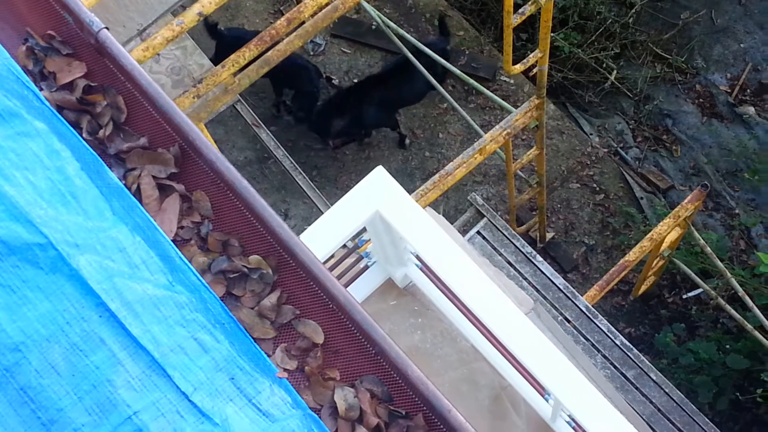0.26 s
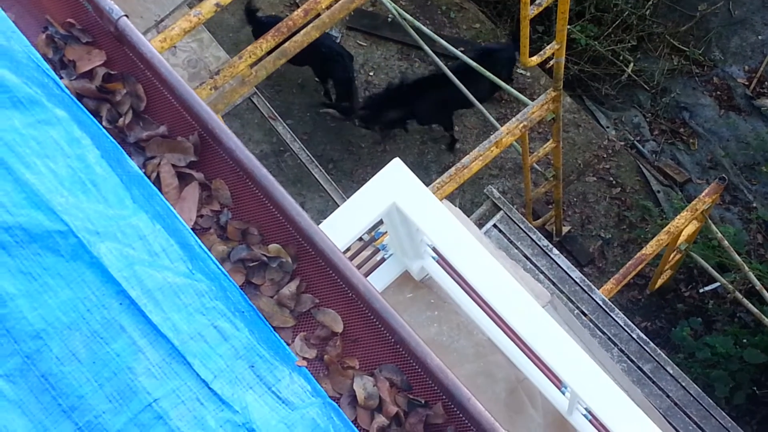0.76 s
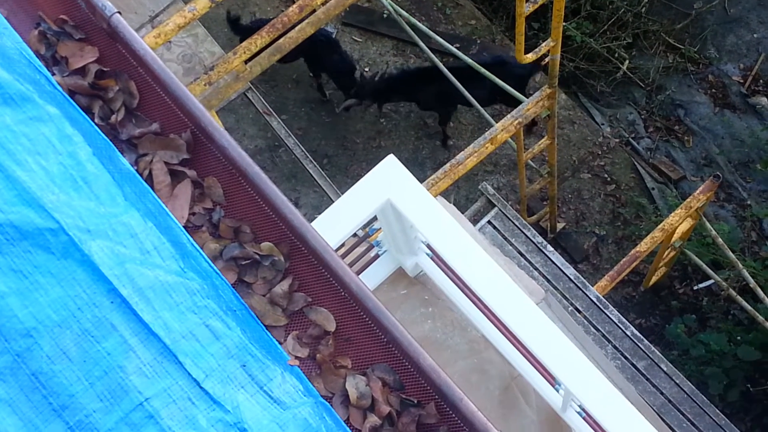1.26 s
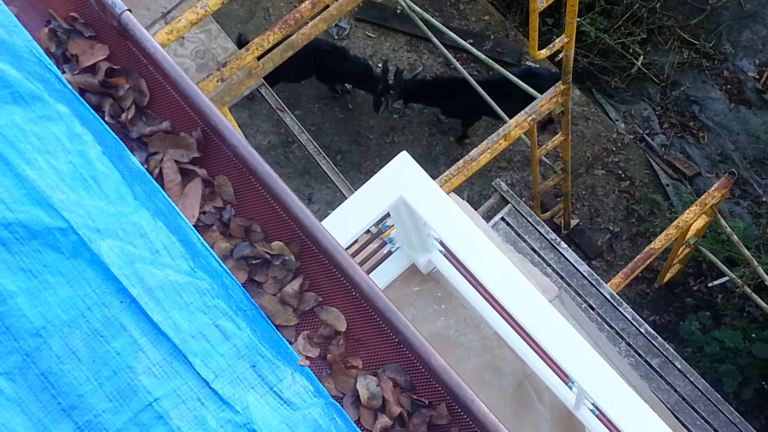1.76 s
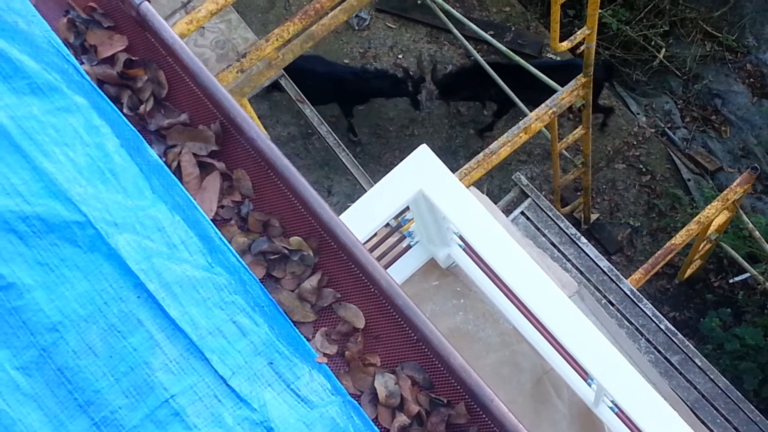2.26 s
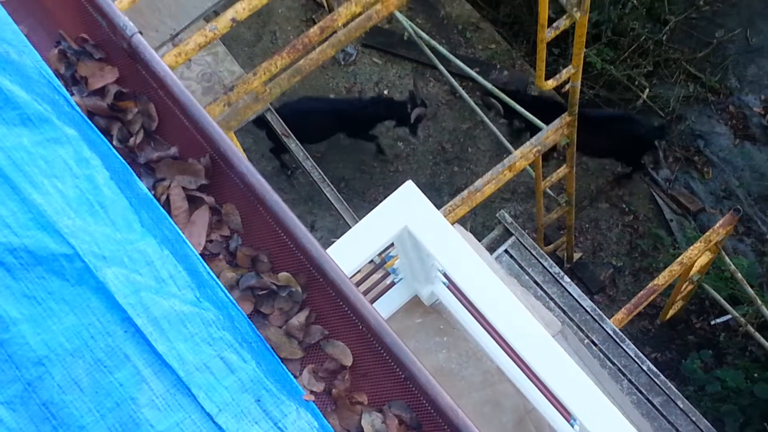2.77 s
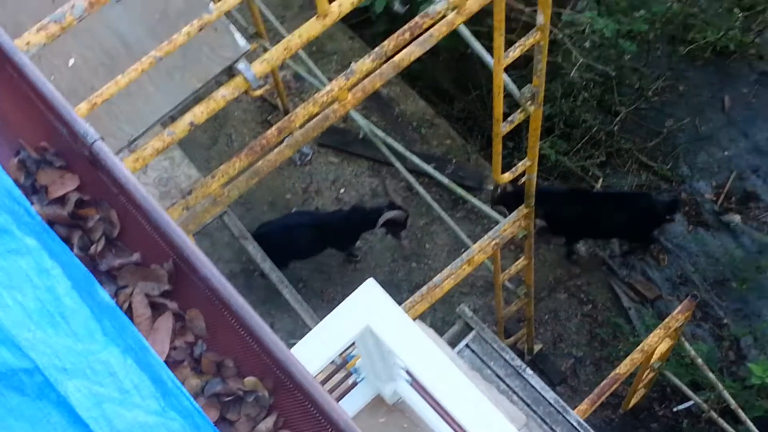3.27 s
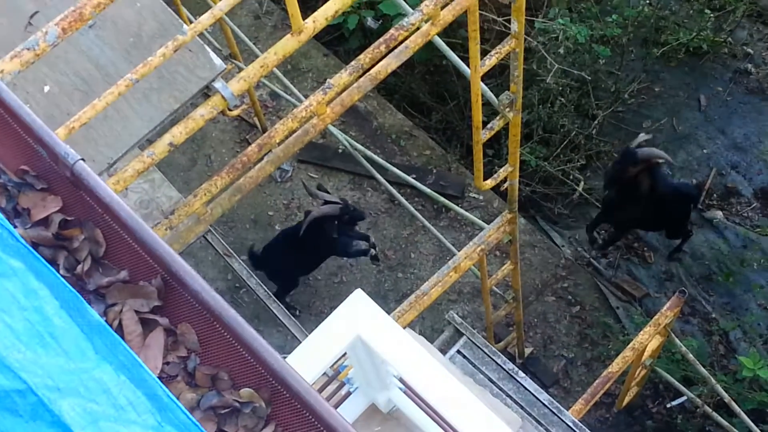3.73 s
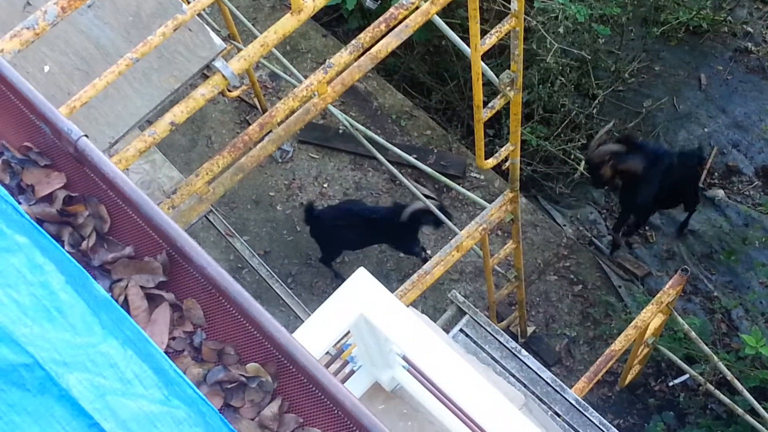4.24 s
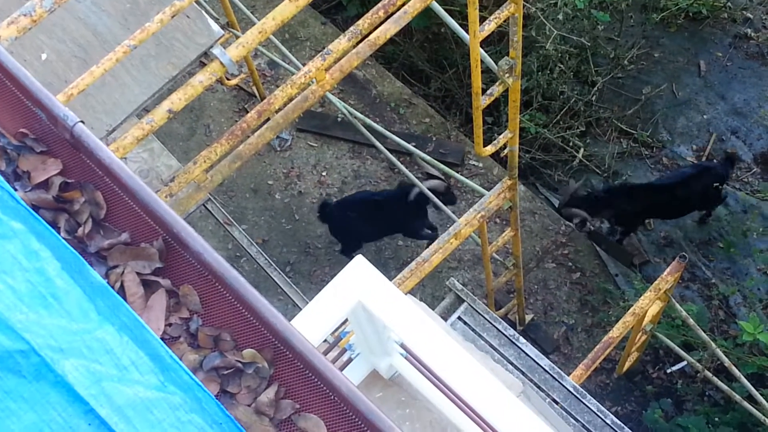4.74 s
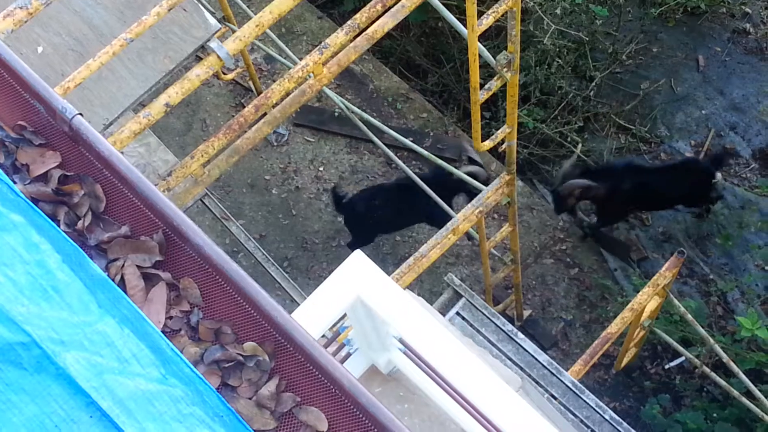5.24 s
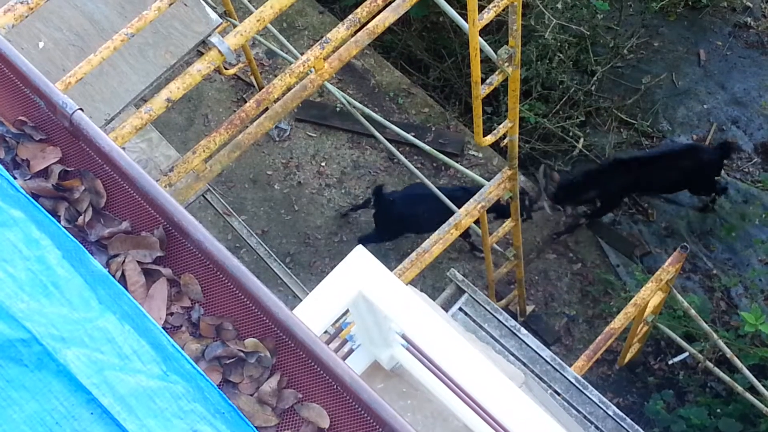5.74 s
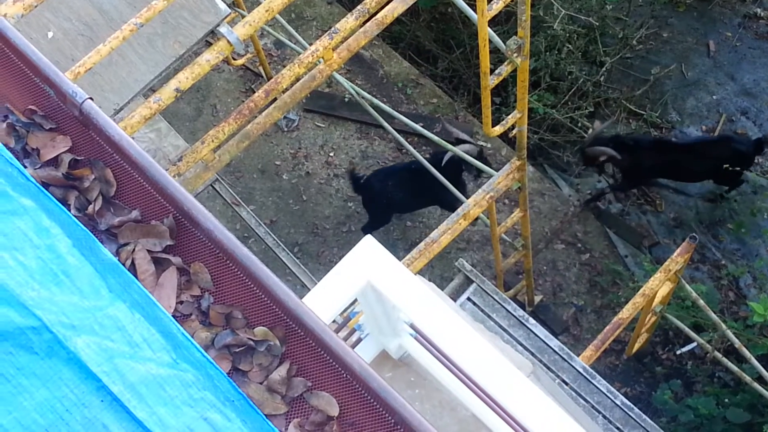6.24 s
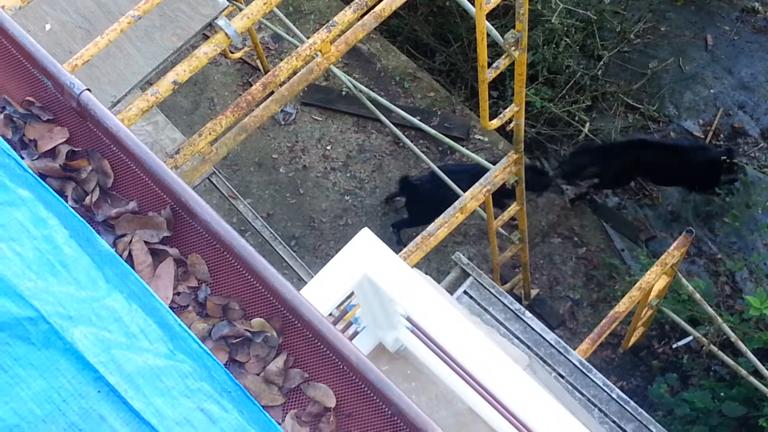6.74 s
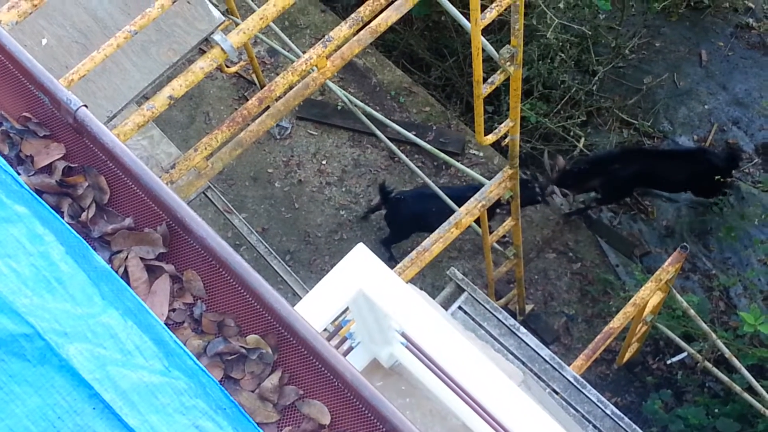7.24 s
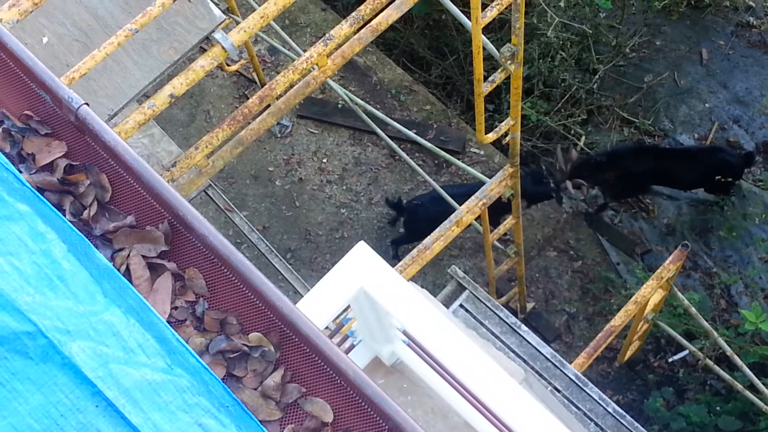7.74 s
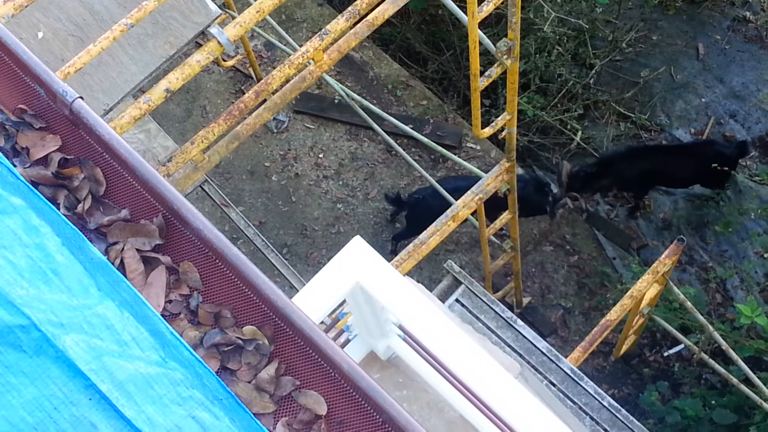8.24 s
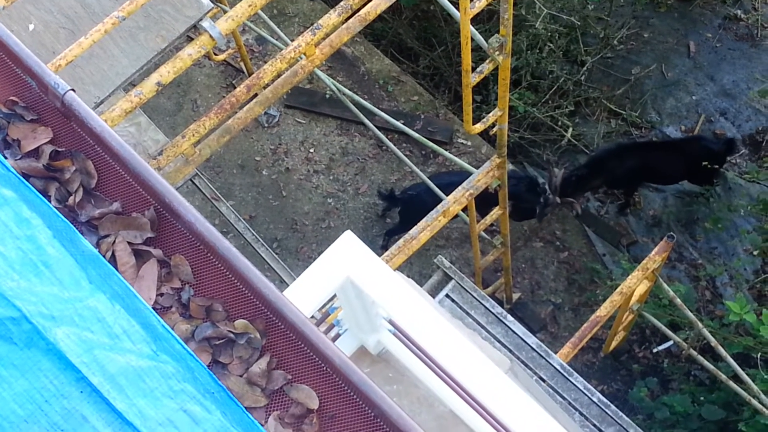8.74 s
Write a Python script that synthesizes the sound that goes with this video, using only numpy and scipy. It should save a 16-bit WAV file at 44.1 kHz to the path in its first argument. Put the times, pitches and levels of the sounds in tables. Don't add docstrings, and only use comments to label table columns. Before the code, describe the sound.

Outdoors, heard from above in stereo, dry litter crunches and crackles under two sparring goats. Small knocks and light stamps lead to a double-contact horn crack, then a second, loudest clash with a dull thump and thrown leaves, after which the rustling thins out. Sharp bird chips punctuate throughout, two blurred trills echo off walls, and a faint low motor hum and thin insect line sit far beneath.

```python
import sys
import numpy as np
from scipy import signal
from scipy.io import wavfile
from scipy.ndimage import uniform_filter1d

SR = 44100
rng = np.random.default_rng(int(sys.argv[2]) if len(sys.argv) > 2 else 0)


def output_pcm(signal):
    pcm = np.clip(np.atleast_2d(signal).T, -1, 1) * 32767
    wavfile.write(sys.argv[1], SR, np.round(pcm).astype(np.int16))


def voltage_ratio(decibels):
    exponent = np.asarray(decibels, float) / 20
    return 10 ** exponent


N = 396900


def at_hz(points, hz):
    points_hz, level_db = np.transpose(points)
    return np.interp(np.log(hz), np.log(points_hz), level_db)


def rms_one(x):
    return x / np.sqrt(np.mean(x ** 2) + 1e-20)


def drift(rate):
    r = np.exp(-80 * np.pi * rate / SR)
    slow = signal.lfilter([1], [1, -2 * r, r * r], rng.standard_normal(N // 40 + 2002))[2000:]
    return np.interp(np.arange(N) / 40, np.arange(len(slow)), rms_one(slow))


def resonate(x, hz, width_hz):
    r = np.exp(-np.pi * width_hz / SR)
    poles = [1, -2 * r * np.cos(2 * np.pi * hz / SR), r * r]
    return signal.lfilter(np.array([1, 0, -1]) * (1 - r * r) / 2, poles, x)


def add(out, s, piece, pan_db, lag_s=0):
    for ear, (at, db) in enumerate([(s + lag_s, pan_db / 2), (s, -pan_db / 2)]):
        i = round(at * SR)
        heard = np.atleast_2d(piece)[-ear][:N - i]
        out[ear, i:i + len(heard)] += heard * voltage_ratio(db)


def burst(dying_s, rise_share):
    dying_s = np.clip(dying_s, .004, .3)
    t = np.arange(int(dying_s * SR)) / SR
    return (1 - np.exp(-t / (rise_share * dying_s))) * voltage_ratio(-60 * t / dying_s)


def whistle(rows, waver_hz):
    s, hz, db = np.transpose(rows)
    t = np.arange(s[0], s[-1], 1 / SR)
    waver = waver_hz * uniform_filter1d(rng.standard_normal(len(t)), size=100) * 10
    phase = 2 * np.pi * np.cumsum(np.interp(t, s, hz) + waver) / SR
    ends = np.clip(np.minimum(t - s[0], s[-1] - t) / .003, 0, 1)
    return np.sqrt(2) * ends * voltage_ratio(np.interp(t, s, db)) * np.sin(phase)


def crackle(per_s, spread_db):
    sizes = voltage_ratio(spread_db * np.minimum(rng.exponential(1, (2, 2, N)), 3.5))
    breaking = rng.random((2, 1, N)) < per_s / SR
    return rng.standard_normal((2, 2, N)) * (1 + sizes * breaking)


# f/Hz, likeness [share]
LIKENESS = [(60, 0.6), (300, 0.45), (700, 0.22), (1500, 0.16), (3000, 0.024), (8000, 0.012)]
FLAT_ABOVE_HZ = 13500


def coloured(source, spectrum, patchy_db):
    out, together = 0, drift(13.8)
    lowest, highest = spectrum[0][0], spectrum[-1][0]
    edges = np.geomspace(lowest, highest, round(2 * np.log2(highest / lowest)) + 1)
    for k, (low, high) in enumerate(zip(edges, edges[1:])):
        band = signal.butter(2, [low, high], "band", fs=SR, output="sos")
        mid, side = signal.sosfilt(band, source[k % 2])
        hz = np.sqrt(low * high)
        alike = np.clip(at_hz(LIKENESS, hz), -1, 1)
        flicker_db = patchy_db * (.45 * together + .9 * drift(20))
        gain = voltage_ratio(at_hz(spectrum, min(hz, FLAT_ABOVE_HZ)) + flicker_db)
        out = out + gain * (np.sqrt(1 + alike) * mid + np.sqrt(1 - alike) * side * [[1], [-1]])
    return rms_one(out)


# f/Hz, density level/dB
AIR = [(15, -37.5), (25, 1), (60, -2), (330, 0), (981, -9.5), (2360, -15), (6840, -14.5), (14400, -18)]
AIR_DB = -70.5


def air():
    return voltage_ratio(AIR_DB) * coloured(rng.standard_normal((2, 2, N)), AIR, patchy_db=1.5)


# from t/s, to t/s
INSECT_PAUSES = [
    (3.9, 4.0),
    (4.27, 4.4),
    (7.96, 8.02),
    (8.27, 8.32),
    (8.57, 8.72),
]
INSECT_HZ, INSECT_DB = 10250, -78


def insect():
    t = np.arange(N) / SR
    resting = sum((t > start) & (t < end) for start, end in INSECT_PAUSES)
    singing = uniform_filter1d(1. - resting, size=400)
    hiss = rng.standard_normal((2, N))
    line = resonate(resonate(hiss, INSECT_HZ, 90), INSECT_HZ, 90) + .02 * np.sin(2 * np.pi * INSECT_HZ * t)
    return singing * voltage_ratio(INSECT_DB + drift(2)) * rms_one(line)


# peak t/s, leaf level/dB, time to sink 20 dB/s, twigs re leaves level/dB
STEPS = [(.27, -57, 0.28, -2), (.625, -66, 0.45, 2), (.685, -61, 0, -6), (.738, -57.5, 0.16, -1),
         (0.885, -57, 0.05, -3), (1.112, -64, .05, -2), (1.291, -59.5, 0.06, 1.5), (1.518, -63.5, 0.07, -2),
         (1.604, -56.5, 0.56, -9), (2.698, -53, 0.06, -6), (4.679, -64, -0.7, 7), (4.72, -71, -0.3, -5),
         (2.874, -59.5, 0, -9), (2.98, -57, 0.3, -1.5), (3.273, -54.5, 0.09, -2), (3.425, -62.5, 0.2, 6.5),
         (3.49, -56.5, 0.14, -5.5), (4.138, -54, -0.12, -3), (4.252, -72, 0.4, -4), (4.474, -42.5, 0.06, 1),
         (4.875, -50, 0.14, 1), (5.4, -57.5, 0.13, 4), (5.774, -55, 0.02, 2), (5.833, -56.5, -0.1, -5),
         (5.89, -64, 0, -1.5), (6.085, -55.5, 0.46, -6), (6.862, -39, 0.0938, 1.5), (7.711, -61, 0.07, -3),
         (8.03, -62, 0.12, 2.5), (8.13, -65.5, -0.13, 0), (8.561, -65, -0.02, -1)]
STEP_SWELL_S, STEP_ROUNDNESS = 0.017, 1.77
# peak t/s, leaf level/dB, 20 dB swell/s, 20 dB sink/s, twigs re leaves level/dB
DRAGS = [(0.03, -48.5, 0, 0.2, -7.5), (.19, -48.5, 0.05, 0.03, -11), (.915, -50.5, -0.02, 0.06, -4.5),
         (1.348, -57, 0.05, 0.05, -2), (1.405, -56.5, 0.02, -0.06, -8), (2.655, -52.5, 0, 0.03, -6),
         (.476, -53, 0.36, 0.2, -2), (1.15, -67, 0.1, 0.02, 0), (1.76, -58, -0.2, 0.78, -12.5),
         (2.2, -57.5, .5, .5, -2), (2.5, -62, 1.6, 0.3, -0.5), (2.757, -55.5, 0.14, 0.04, -3.5),
         (2.905, -53.5, 0.03, 0.08, -4), (4.3, -66, 0.3, 0.2, -10), (4.595, -56.5, 0.17, -0.06, 2.5),
         (3.7, -60, 0.07, 0.26, 3), (4.378, -55, 0.17, 0.22, 3), (4.802, -62.5, 0.36, 0.16, 0),
         (5.118, -55.5, 0.17, -0.38, 3.5), (5.3, -57.5, 0.5, 0.14, 4.5), (5.44, -60, 0.26, -0.23, -6),
         (5.67, -51.5, 0.13, 0.21, 3.5), (6.03, -61.5, 0.5, 0.7, -1), (6.363, -55.5, 0.25, 0.53, -3.5),
         (6.76, -59, 0.6, 0.15, 1.5), (6.964, -48, -0.08, 0.0959, -5), (7.094, -48, -0.03, -0.0458, -4.5),
         (7.185, -58.5, 0.55, 0.07, -5.5), (7.3, -57, 0.17, 0.1043, -2), (7.75, -55.5, -0.03, 0.07, 0),
         (7.8, -59, 0, 0.06, -6), (1.44, -61, 0.12, -0.07, -5.5), (1.19, -62, .1, 0, 2.5),
         (8.247, -68.5, 0.3, 0, 0.5), (8.698, -78, 0.44, -0.1, 6), (8.86, -86.5, 2, 0, -6.5)]
DRAG_ROUNDNESS = 1.23
JOLT_DB, JOLT_DELAY_S, JOLT_SWELL_S, JOLT_SINK_S, JOLT_TWIGS_DB = -41, .005, 0.007, 0.17, 7
LITTER_REST_DB = -92


def stirring():
    t = np.arange(0, N + 16, 16) / SR
    moves = [(s, db, STEP_SWELL_S, sink_s, twig_db, STEP_ROUNDNESS) for s, db, sink_s, twig_db in STEPS]
    moves += [(*row, DRAG_ROUNDNESS) for row in DRAGS]
    moves += [(s + JOLT_DELAY_S, JOLT_DB, JOLT_SWELL_S, JOLT_SINK_S, JOLT_TWIGS_DB, STEP_ROUNDNESS)
              for s, *_ in CLASHES]
    s, db, swell_s, sink_s, twig_db, roundness = np.transpose(moves)[:, :, None]
    shortest_s = np.where(t < s, .003, .012)
    away = np.abs(t - s) / np.maximum(np.where(t < s, swell_s, sink_s), shortest_s)
    power = voltage_ratio(db - 20 * away ** roundness) ** 2
    layers = (power.sum(axis=0), (power * voltage_ratio(twig_db) ** 2).sum(axis=0))
    return [np.interp(np.arange(N) / SR, t, 10 * np.log10(p + voltage_ratio(LITTER_REST_DB) ** 2)) for p in layers]


# t/s, peak level/dB
SNAPS = [(0.023, -40), (0.2636, -36), (1.886, -69), (1.918, -29.5), (2.497, -30.5), (2.546, -36),
         (3.269, -54), (3.2889, -47.5), (3.4383, -32.5), (4.117, -35), (4.26, -38), (4.371, -37),
         (4.492, -24.5), (4.886, -39), (4.898, -22), (4.9298, -27), (4.966, -31), (5.049, -35),
         (5.111, -28.5), (5.8254, -58), (6.0896, -30), (6.2952, -30), (6.3108, -29), (6.868, -16.5),
         (6.9008, -12.5), (6.939, -21), (7.705, -47.5), (7.8023, -45), (8.558, -53)]
# f/Hz, density level/dB
LEAVES = [(1650, -29), (2800, -15.5), (3500, -7), (5000, -4.5), (7510, -0.5), (8900, -4.5), (11300, -4),
          (14400, -16)]
TWIGS = [(210, -33.5), (350, -5), (448, -3.5), (1600, -2.5), (1940, 0.5), (3400, -11.5), (4420, -39),
         (7480, -120)]
GROUND = [(18, -30.5), (30, -14), (86, -1), (211, -1), (324, -5.5), (450, -3.5), (580, -37.5), (990, -120)]
GROUND_DB, GROUND_FOLLOWS, GROUND_SLOW_S = -29, 0.58, 0.035
FINE_DB, FINE_PER_TWIG, FINE_PER_LEAF = -11, -0.96, -0.19


def scuffle():
    leaf_db, twig_db = stirring()
    fine_db = FINE_DB + FINE_PER_TWIG * (twig_db - leaf_db) + FINE_PER_LEAF * leaf_db
    ground_db = GROUND_DB + GROUND_FOLLOWS * uniform_filter1d(twig_db, size=int(GROUND_SLOW_S * SR))
    grains = crackle(per_s=600., spread_db=4.5)
    leaves = coloured(grains, LEAVES, patchy_db=2.0)
    fine = signal.sosfilt(signal.butter(2, 9500, "high", fs=SR, output="sos"), leaves)
    snaps = np.zeros((2, N))
    for s, db in SNAPS:
        add(snaps, s, voltage_ratio(db - 5) * burst(.015, rise_share=.015), pan_db=0)
    out = voltage_ratio(leaf_db + 8.0) * (leaves - fine)
    out += voltage_ratio(leaf_db + fine_db + np.array([[1.5], [-1.5]])) * rms_one(fine)
    out += snaps * leaves
    out += voltage_ratio(twig_db - 1.5) * coloured(grains, TWIGS, patchy_db=1.2)
    return out + voltage_ratio(ground_db - 2.0) * coloured(grains, GROUND, patchy_db=2.5)


# t/s, peak level/dB, f/Hz
TWIG_TICKS = [(0.022, -42, 3300), (0.734, -34.5, 2300), (1.624, -43, 2620), (2.751, -41.5, 2020),
              (3.036, -39, 1350), (3.466, -39, 2080), (3.835, -50, 1310), (4.232, -60.5, 1030),
              (4.392, -33, 1940), (4.822, -40.5, 2300), (4.864, -35, 1710), (4.898, -31.5, 1720),
              (4.94, -31, 2750), (5.042, -32.5, 1820), (5.073, -42, 1380), (5.412, -38, 2400),
              (5.441, -44.5, 2720), (5.612, -35, 2420), (5.665, -22, 950), (5.901, -52, 2010),
              (5.4845, -18, 3300), (5.4895, -19, 2900), (5.497, -18.5, 1100), (5.5345, -23, 800),
              (5.31, -45.5, 600), (6.52, -40, 1880), (5.935, -46, 2330), (6.025, -43.5, 2020),
              (6.115, -41, 2010), (6.248, -40.5, 2390), (6.379, -40, 1440), (6.762, -41, 1700),
              (6.805, -8, 1350), (6.814, -12, 1200), (6.9, -22, 1630), (7.06, -44, 1973),
              (7.725, -36, 2100), (7.949, -61, 771), (7.999, -54, 2050), (8.093, -51.5, 2720),
              (8.209, -56, 805)]
TWIG_TICK_S, TWIG_WIDTH_SHARE = 0.008, 0.41
# t/s, peak level/dB, f/Hz
LEAF_TICKS = [(0.0318, -23, 7930), (0.2663, -36, 7890), (0.6868, -37.5, 7500), (0.7554, -40, 7270),
              (0.8804, -38, 6800), (1.1672, -41, 7210), (1.516, -39.5, 6810), (1.6404, -35, 7100),
              (2.8998, -30.5, 7390), (2.9287, -32, 7690), (2.9484, -35, 6830), (3.269, -31.5, 6400),
              (3.4994, -31, 6060), (3.5064, -30, 5400), (3.5384, -39, 7510), (3.5774, -47, 6930),
              (3.6641, -38, 9210), (4.2482, -42, 7600), (4.3011, -40, 5110), (4.6713, -48, 7230),
              (4.7162, -60, 6610), (4.9297, -33, 8980), (5.0429, -31.5, 6490), (5.1174, -29.5, 7400),
              (5.438, -37, 7000), (5.7708, -34, 4260), (5.8292, -37, 7000), (6.0886, -37, 9280),
              (6.8354, -14.5, 8000), (6.8774, -14, 7950), (7.0599, -41.5, 8100), (7.1851, -40, 7690),
              (7.7264, -42, 4890), (7.7333, -28, 6930), (7.705, -42, 12500), (7.774, -45, 11500),
              (7.79, -46.5, 12500), (7.803, -40.5, 11000), (5.111, -34, 13500), (5.4975, -22, 7500),
              (5.471, -18, 7000), (1.64, -42, 11000), (1.337, -42, 4600), (0.63, -42, 9500),
              (1.746, -42, 4630), (5.298, -38, 5500), (3.771, -40, 7230), (8.37, -58, 10000)]
LEAF_TICK_S, LEAF_WIDTH_SHARE = 0.014, 0.11
TICK_DB = -2


def ticks():
    out = np.zeros((2, N))
    kinds = ((TWIG_TICKS, TWIG_TICK_S, TWIG_WIDTH_SHARE), (LEAF_TICKS, LEAF_TICK_S, LEAF_WIDTH_SHARE))
    for table, dying_s, width_share in kinds:
        for (s, db, hz), grit in zip(table, rng.standard_normal((len(table), 3, SR // 20))):
            shape = burst(dying_s, rise_share=.03)
            ears = grit[0] + 0.57 * grit[1:]
            snap = resonate(ears[:, :len(shape)] * shape, hz, width_share * hz)
            add(out, s, voltage_ratio(db + TICK_DB) * snap / np.abs(snap).max(), pan_db=1.1)
    return out


# t/s, length/s, f/Hz, level/dB
TUBE = [(0.25, 0.023, 1640, -61), (0.29, 0.12, 1634, -57), (0.395, 0.054, 1456, -45.5),
        (0.445, 0.033, 1476, -48), (0.477, 0.05, 1580, -52), (0.525, 0.025, 1490, -46),
        (0.551, 0.043, 1546, -48), (.59, 0.039, 1535, -61), (0.626, 0.045, 1517, -53.5),
        (1.023, .1, 1850, -72), (7.765, .04, 723, -72), (5.628, 0.029, 2780, -39), (8.87, .11, 1090, -80),
        (2.13, .07, 2900, -62)]


def tube():
    out = np.zeros((2, N))
    for s, length_s, hz, db in TUBE:
        slip = [(-.003, 1.01 * hz, db - 10), (0.3 * length_s, .99 * hz, db + 1),
                (.6 * length_s, hz, db), (length_s + .002, 1.01 * hz, db - 12)]
        add(out, s - .003, whistle(slip, waver_hz=41.5), pan_db=-0.5, lag_s=0.00021)
    return out


# start t/s, start f/Hz, lowest f/Hz, rebound f/Hz, level/dB
CHIPS = [
    (.331, 9600, 8950, 1100, -27),
    (1.28, 11400, 8950, 500, -29),
    (2.056, 9800, 9050, 600, -33),
    (2.991, 10400, 9100, 1300, -27),
    (3.687, 9600, 8250, 1300, -24.5),
    (4.862, 9800, 8950, 1400, -24),
    (6.11, 10300, 9250, 500, -24),
    (7.247, 10300, 8650, 1100, -25),
    (8.038, 9800, 8600, 1100, -26.5),
]
# top f/Hz, relative level/dB, turn t/s
CHIP_LEVELS = [(13400, -17, 0.0088), (13600, -40, 0.0074), (13200, -14, 0.01), (13900, -19, 0.0076),
               (12700, -28, 0.0121), (12280, -18, .009), (13000, -26, 0.0075), (13300, -16, 0.0097),
               (13270, -19, 0.0074)]
CHIP_REBOUND_S, CHIP_PAN_DB = .015, 2
ROOF_ECHO_S, ROOF_ECHO_DB = 0.0062, -10


def chips():
    out = np.zeros((2, N))
    for (s, start_hz, low_hz, rebound_hz, db), (top_hz, upper_db, turn_s) in zip(CHIPS, CHIP_LEVELS):
        lower = [(0, start_hz, db - 12),
                 (0.46 * turn_s, .5 * low_hz + .5 * start_hz, db - 6.5),
                 (turn_s, low_hz, db - 1.5),
                 (turn_s + 0.31 * CHIP_REBOUND_S, low_hz + 0.34 * rebound_hz, db - 5.0),
                 (turn_s + CHIP_REBOUND_S, low_hz + 1.06 * rebound_hz, db - 12.5)]
        top_db = db + upper_db
        upper = [(0, top_hz - 1900, top_db - 9), (.006, top_hz + 200, top_db - 1),
                 (.015, top_hz - 900, top_db - 5)]
        call = whistle(lower, waver_hz=45.)
        add(out, s, call, CHIP_PAN_DB, lag_s=-1 / SR)
        add(out, s + ROOF_ECHO_S, voltage_ratio(ROOF_ECHO_DB) * call, -CHIP_PAN_DB, lag_s=.0002)
        add(out, s + .012, whistle(upper, waver_hz=150.), CHIP_PAN_DB + 2.5, lag_s=.0003)
    return out


# t/s, peak level/dB, body f/Hz, left re right level/dB
KNOCKS = [(0.338, -41.5, 1280, 4), (1.183, -41, 2000, 5), (2.376, -35.5, 1650, 11), (2.964, -46, 425, 9),
          (3.268, -43.5, 2570, 11.5), (3.412, -47.5, 1330, -2), (3.436, -30, 690, -0.5),
          (3.504, -25.5, 1060, -2.5), (4.886, -34, 1520, 1.5), (5.483, -25.5, 3320, 6.5),
          (5.494, -20, 1070, -2.5), (5.532, -24.5, 825, -1.5), (5.612, -37, 2440, -4), (5.77, -35, 1600, 2),
          (6.313, -35.5, 1950, 4.5), (6.517, -47.5, 2070, -1.5), (6.802, -16.5, 902, 1.5),
          (6.817, -19, 1003, -6.5), (6.832, -16.5, 1700, 2), (6.899, -24.5, 2334, 2)]
KNOCK_SPRAY_DB, KNOCK_DYING_S = -15.5, 0.0381
# t/s, peak level/dB, body f/Hz, leaf spray relative level/dB
STAMPS = [(.744, -33.5, 473, 3.5), (0.881, -47.5, 3700, 1), (3.144, -47, 1010, -14), (3.288, -47, 2980, 2),
          (4.456, -36, 2200, -4.5), (4.486, -25.5, 980, 0), (4.777, -46.5, 423, -11.5),
          (4.863, -49.5, 1700, 11.5), (5.049, -32.5, 2350, -8), (5.111, -30, 2200, -6.5),
          (5.591, -30.5, 2460, -13), (6.249, -54, 2400, 14), (7.74, -35, 1500, 7)]
STAMP_PAN_DB, STAMP_DYING_S = 1, 0.031
SOIL_CUT_HZ = 2800


def knocks():
    out = np.zeros((2, N))
    blows = [(s, db, hz, KNOCK_SPRAY_DB, pan_db, KNOCK_DYING_S) for s, db, hz, pan_db in KNOCKS]
    blows += [(s, db, hz, spray_db, STAMP_PAN_DB, STAMP_DYING_S) for s, db, hz, spray_db in STAMPS]
    pushes = rng.standard_normal((len(blows), 3, SR // 10))
    for (s, db, hz, spray_db, pan_db, dying_s), push in zip(blows, pushes):
        shape = burst(dying_s, rise_share=0.015)[:SR // 10]
        soil = 0.27 * resonate(push[0], 1100, 1700) + 0.47 * resonate(push[0], 100, 253)
        body = rms_one(resonate(push[0], hz, 0.41 * hz) + soil)
        dull = signal.butter(3, max(SOIL_CUT_HZ, 1.29 * hz), fs=SR, output="sos")
        spray = rms_one(resonate(push[1:], 5500, 5010))
        blow = signal.sosfilt(dull, body) + voltage_ratio(spray_db) * spray
        add(out, s, voltage_ratio(db - 3.0) * shape * blow[:, :len(shape)], pan_db)
    return out


# peak t/s, rms level/dB, body f/Hz, swell/s, fall/s
LANDINGS = [
    (.746, -55, 600, 0.012, 0.021),
    (2.995, -41.5, 465, 0.012, 0.023),
    (3.507, -40, 980, 0.008, 0.011),
    (4.132, -52, 1080, 0.011, 0.015),
    (4.492, -29.5, 1210, 0.013, 0.014),
    (5.668, -38, 950, 0.0025, 0.012),
    (6.853, -26, 910, 0.0089, 0.0078),
    (7.745, -54.5, 200, 0.0061, .03),
    (1.29, -60.5, 150, 0.011, 0.035),
    (4.3, -64, 200, 0.018, 0.025),
]


def landings():
    out, t = np.zeros((2, N)), np.arange(-SR // 10, SR // 5) / SR
    dull = signal.butter(4, SOIL_CUT_HZ, fs=SR, output="sos")
    for (s, db, hz, swell_s, fall_s), push in zip(LANDINGS, rng.standard_normal((len(LANDINGS), len(t)))):
        pressed = push + resonate(push, hz, 0.75 * hz) + 0.26 * resonate(push, 97, 150)
        crunch = rms_one(signal.sosfilt(dull, pressed))
        shape = np.exp(-np.abs(t) / np.where(t < 0, swell_s, fall_s))
        add(out, s + t[0], voltage_ratio(db) * crunch * shape, pan_db=1.5)
    return out


# t/s, level/dB, centre f/Hz, dying/s
DEBRIS = [
    (5.477, -30, 3600, .28),
    (6.8, -30, 4200, .25),
    (1.33, -50, 5600, .25),
    (1.882, -47, 12500, .07),
    (8.04, -54, 4000, .28),
    (6.9005, -24, 5000, .02),
]


def debris():
    out = np.zeros((2, N))
    for (s, db, hz, dying_s), grit in zip(DEBRIS, rng.standard_normal((len(DEBRIS), 2, 2, SR // 3))):
        shape = burst(dying_s, rise_share=.04)
        hiss = rms_one(resonate(grit[0] * grit[1], hz, .7 * hz))
        add(out, s, voltage_ratio(db) * shape * hiss[:, :len(shape)], pan_db=1.5)
    return out


# t/s, level/dB
DRONE = [(0.0, -100), (1.58, -88), (1.9, -71), (2.88, -73), (3.58, -87), (5.41, -72), (9.0, -96.5)]
DRONE_HZ = 103


def drone():
    s, db = np.transpose(DRONE)
    hum = resonate(resonate(rng.standard_normal(N), DRONE_HZ, 17), DRONE_HZ, 17)
    return voltage_ratio(np.interp(np.arange(N) / SR, s, db)) * rms_one(hum)


# t/s, centre f/Hz, level/dB
TRILLS = [
    [(1.72, 6210, -61), (1.95, 6600, -47.5), (2.06, 7280, -44.5), (2.16, 8100, -44), (2.25, 7760, -40.5),
     (2.36, 8200, -39.5), (2.52, 8130, -60)],
    [(6.2, 6970, -56), (6.45, 6780, -45), (6.53, 7410, -49.5), (6.62, 7990, -38.5), (6.7, 7720, -42),
     (6.79, 7830, -38), (6.95, 8000, -47)],
]
# t/s, f/Hz, level/dB
WHISTLES = [
    [(2.085, 8660, -39), (2.12, 8380, -38), (2.15, 7810, -23), (2.175, 6870, -41), (2.19, 6910, -74)],
    [(6.526, 7800, -50), (6.56, 8050, -36), (6.59, 7750, -33), (6.62, 7320, -38.5), (6.63, 6600, -54)],
    [(6.514, 8200, -41), (6.535, 8400, -36.5), (6.56, 8550, -49)],
    [(6.71, 8460, -41), (6.73, 8800, -29.5)],
    [(2.27, 8780, -51), (2.29, 8700, -34)],
    [(2.095, 2980, -59), (2.13, 2860, -51.5), (2.14, 2600, -64), (2.152, 2320, -56), (2.18, 2256, -56),
     (2.24, 2260, -66)],
    [(8.59, 2290, -75.5), (8.62, 2430, -66), (8.67, 2446, -61.5), (8.71, 2456, -72), (8.75, 2430, -75),
     (8.82, 2430, -86)],
]


def song():
    out = np.zeros((2, N))
    for rows in TRILLS:
        s, hz, db = np.transpose(rows)
        t = np.arange(s[0], s[-1], 1 / SR)
        ends = np.clip(np.minimum(t - s[0], s[-1] - t) / 0.0091, 0, 1)
        for ear in (0, 1):
            cycle = np.cumsum(140 * voltage_ratio(2.8 * drift(30)[:len(t)])) / SR % 1
            pitch = np.interp(t, s, hz) + 1900 * (.5 - cycle) + 600 * drift(400)[:len(t)]
            level_db = np.interp(t, s, db) + 6.0 + 0.77 * drift(40)[:len(t)]
            loud = ends * voltage_ratio(level_db) * np.sin(np.pi * cycle)
            out[ear, round(s[0] * SR):][:len(t)] += loud * np.sin(2 * np.pi * np.cumsum(pitch) / SR)
    for rows in WHISTLES:
        add(out, rows[0][0], whistle(rows, waver_hz=30.), pan_db=.8, lag_s=.0003)
    return out


# t/s, peak level/dB, horn f/Hz, second contact relative level/dB, thump level/dB
CLASHES = [
    (5.471, -13, 2510, 7, -44),
    (6.7953, -5.5, 1712, -5, -39),
]
SECOND_CONTACT_S = 0.002663
HORN_CYCLES, HORN_LOW_CUT_HZ = 4.2, 620


def clashes():
    out, t = np.zeros((2, N)), np.arange(SR // 4) / SR
    thin = signal.butter(2, HORN_LOW_CUT_HZ, "high", fs=SR, output="sos")
    thump = np.sin(2 * np.pi * 81 * t) * t / .022 * np.exp(1 - t / .022)
    damped = np.clip((SECOND_CONTACT_S - t) / .0004, 0, 1)
    for (s, db, hz, second_db, thump_db), lag_s in zip(CLASHES, (19 / SR, 0)):
        hollow = np.sin(2 * np.pi * hz * t) + 0.77 * np.sin(2 * np.pi * 1.5 * hz * t) * np.exp(-t / 0.0011)
        crack = resonate(rng.standard_normal(len(t)), 5000, 4100) * np.exp(-t / 0.0019)
        crack = .55 * crack / np.abs(crack).max()
        first = signal.sosfilt(thin, hollow * np.exp(-t * hz / HORN_CYCLES) * damped + crack)
        second = signal.sosfilt(thin, hollow * np.exp(-t * hz / 2.1) + crack)
        add(out, s, voltage_ratio(db) * first, .3, lag_s)
        add(out, s + SECOND_CONTACT_S, voltage_ratio(db + second_db) * second, .3, lag_s)
        add(out, s + .025, voltage_ratio(thump_db) * thump, pan_db=-1.5)
    return out


YARD_T60_S, FAR_T60_S = .32, .8


def yard(x):
    t = np.arange(SR // 2) / SR
    uneven = voltage_ratio(2.2 * np.minimum(rng.exponential(1, (2, len(t))), 4))
    decay = voltage_ratio(-60 * t / YARD_T60_S) + .003 * voltage_ratio(-60 * t / FAR_T60_S)
    returns = rng.standard_normal((2, len(t))) * uneven * decay * (t > .004)
    returns = returns / np.linalg.norm(returns, axis=1, keepdims=True)
    return signal.fftconvolve(x, returns, axes=1)[:, :N]


BIRD_WET_DB, GOAT_WET_DB = -4, -16


def scene():
    birds = chips() + song()
    blows = knocks() + landings() + clashes() + ticks()
    echoes = yard(voltage_ratio(BIRD_WET_DB) * birds + voltage_ratio(GOAT_WET_DB) * blows)
    return birds + blows + scuffle() + air() + tube() + drone() + insect() + echoes + debris()


def roll_off(x):
    return signal.sosfilt(signal.butter(12, 15860, fs=SR, output="sos"), x)


PORT_DIP_HZ, PORT_DIP_SHARE = 3550, 0.31
CUTOFF_HZ = 14620


def record(dry):
    dry = signal.sosfilt(signal.butter(2, 45, "high", fs=SR, output="sos"), dry)
    dry = dry - PORT_DIP_SHARE * resonate(dry, PORT_DIP_HZ, 600)
    mix = signal.sosfilt(signal.ellip(10, .5, 34, CUTOFF_HZ, fs=SR, output="sos"), dry)
    return roll_off(mix)


dry = scene()
out = record(dry)
output_pcm(out)
```